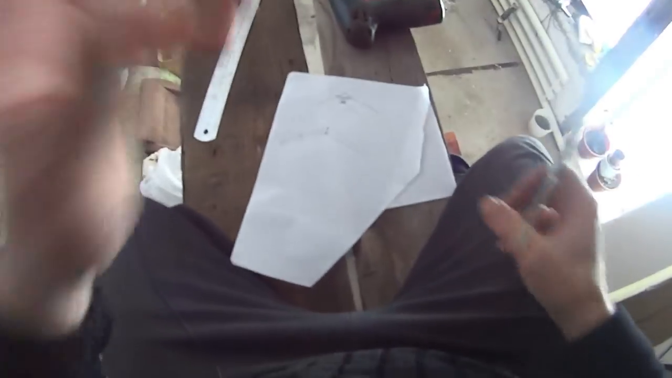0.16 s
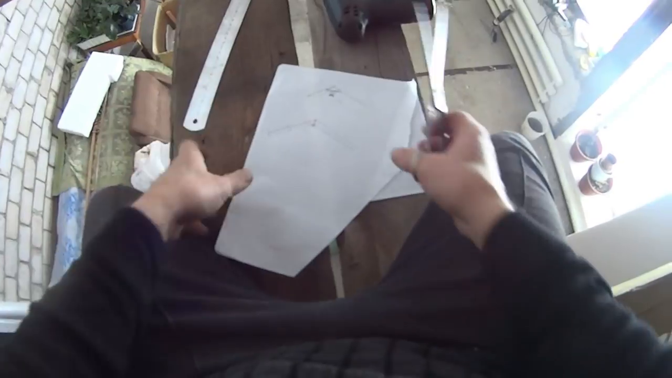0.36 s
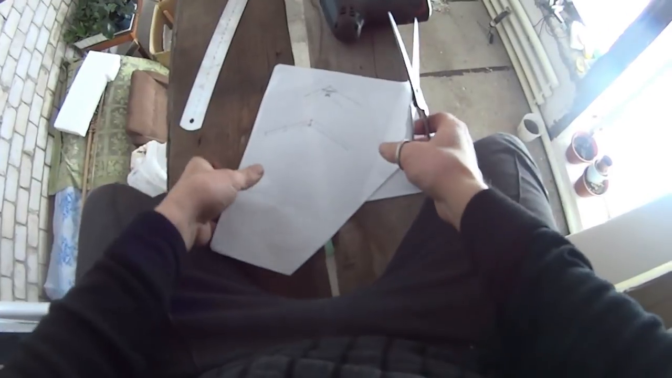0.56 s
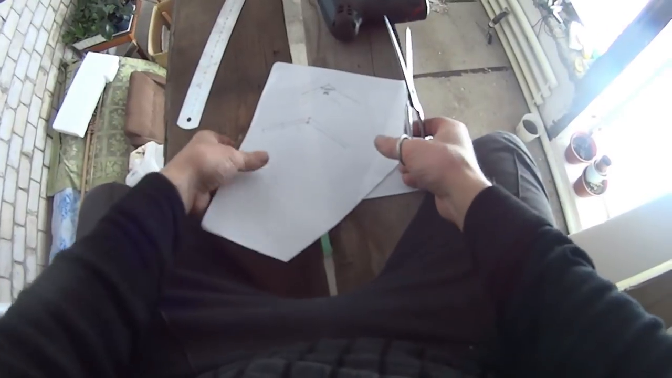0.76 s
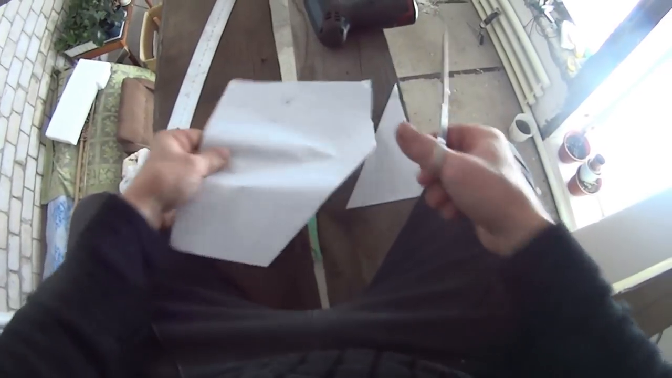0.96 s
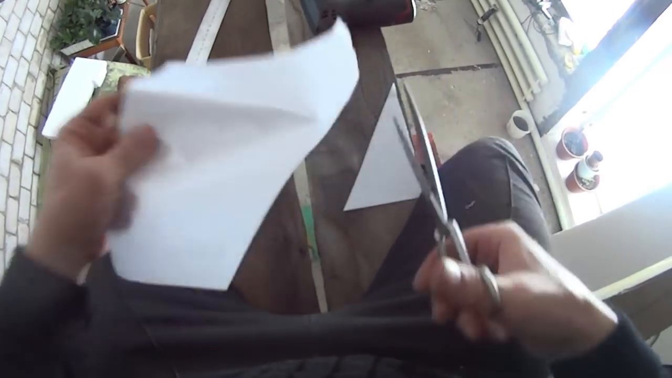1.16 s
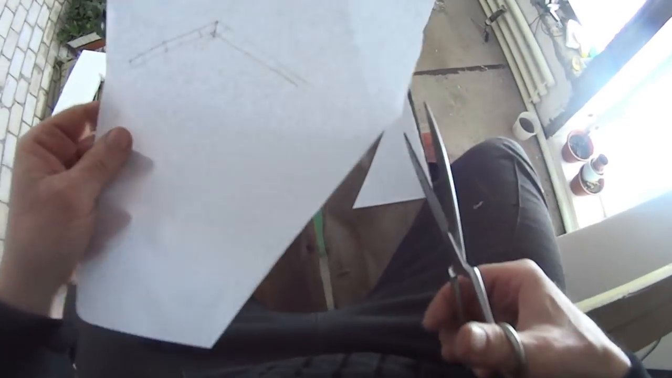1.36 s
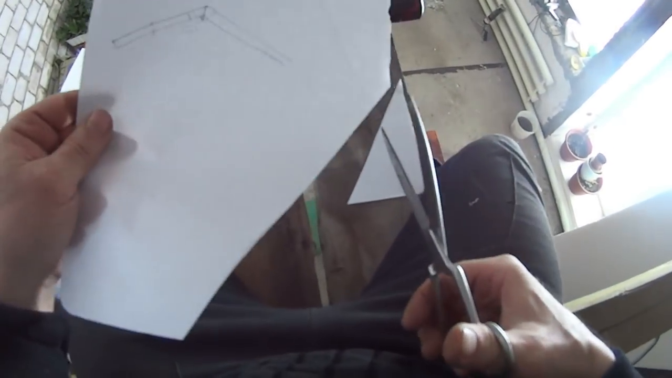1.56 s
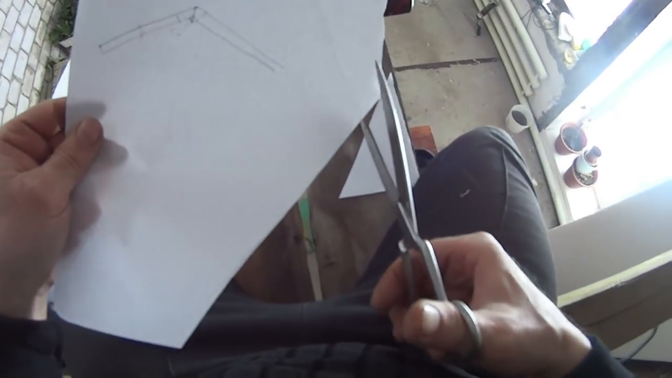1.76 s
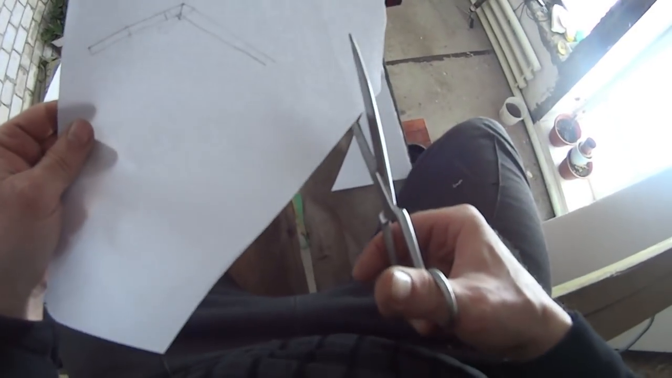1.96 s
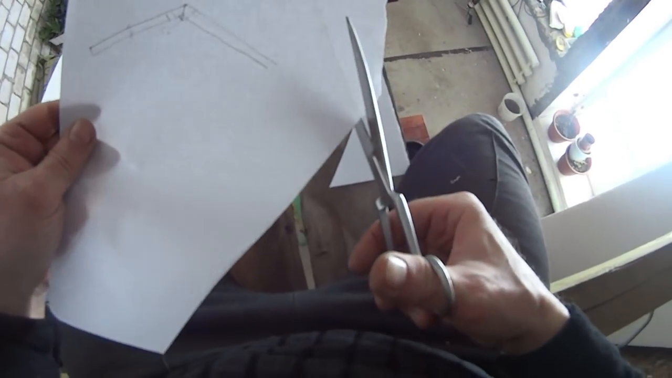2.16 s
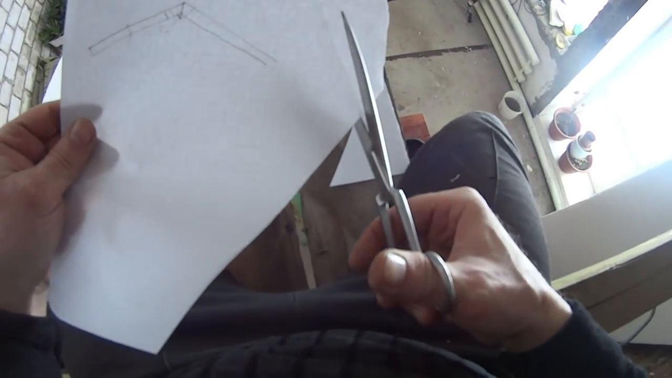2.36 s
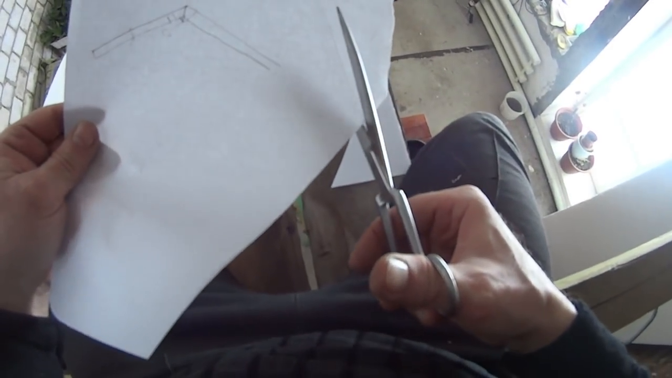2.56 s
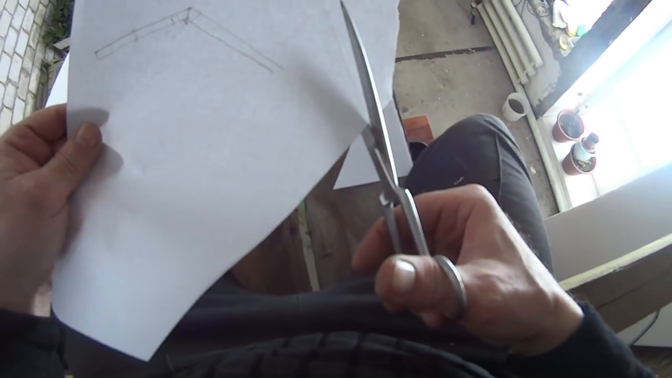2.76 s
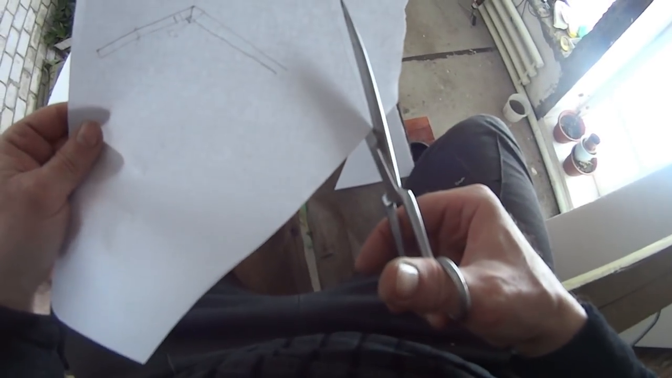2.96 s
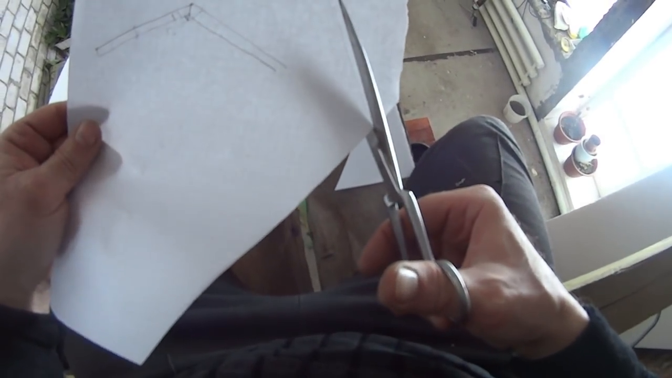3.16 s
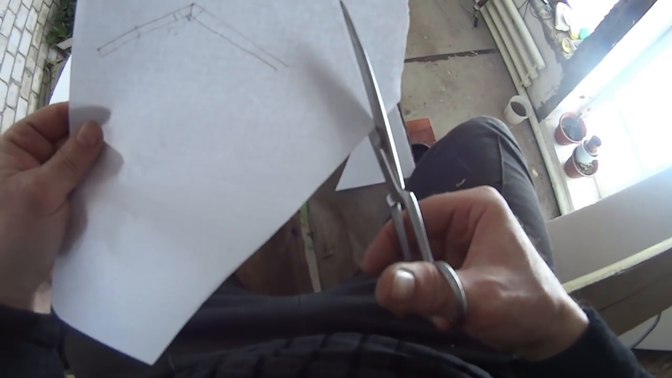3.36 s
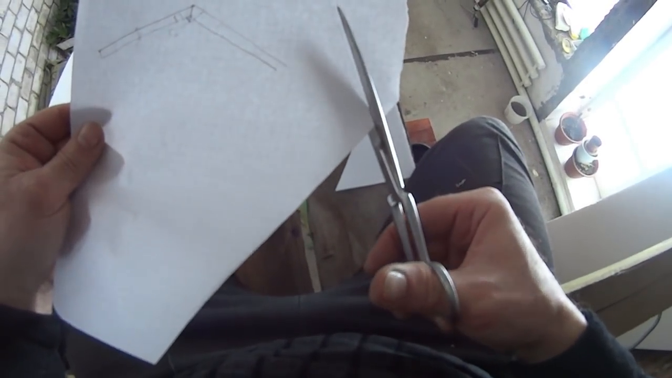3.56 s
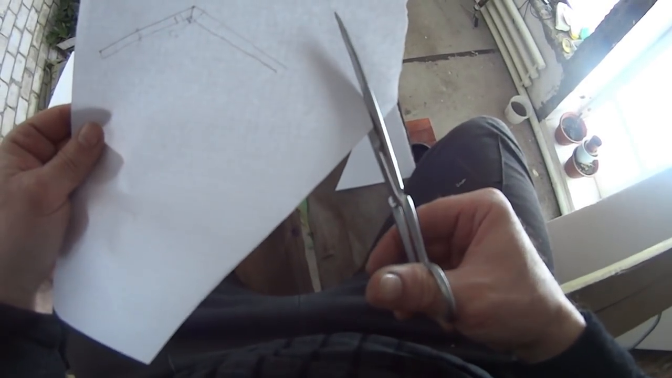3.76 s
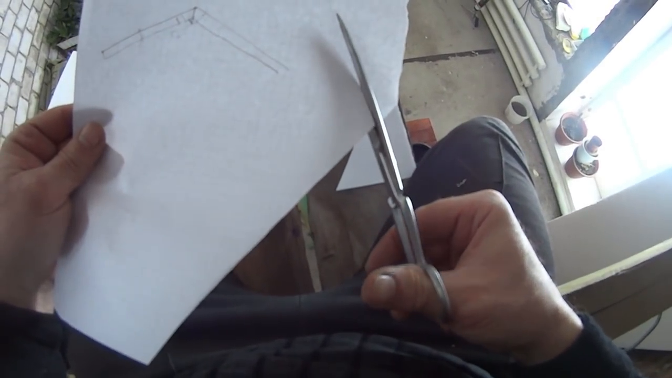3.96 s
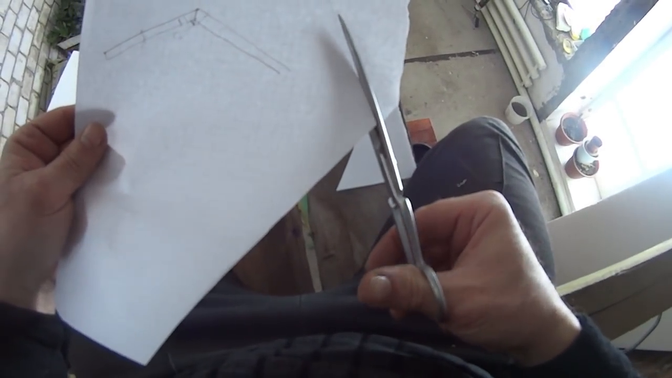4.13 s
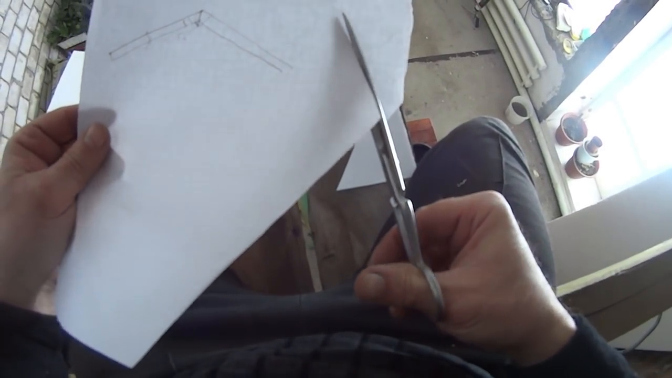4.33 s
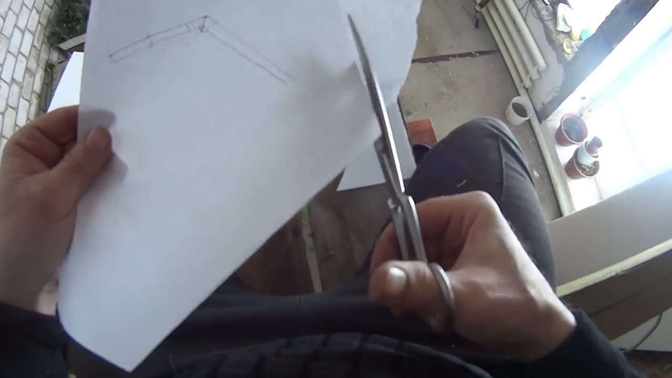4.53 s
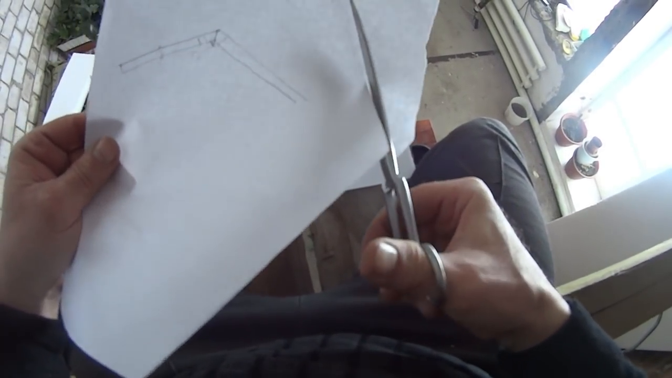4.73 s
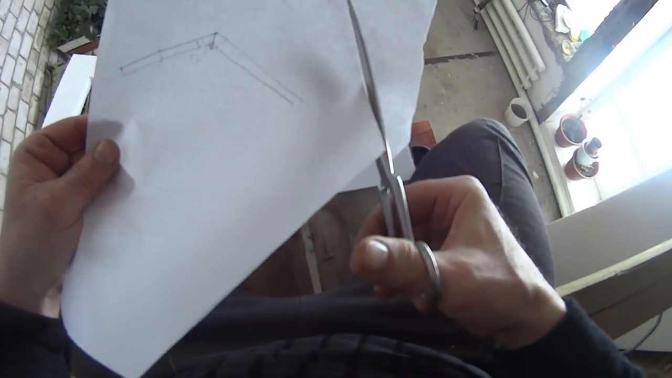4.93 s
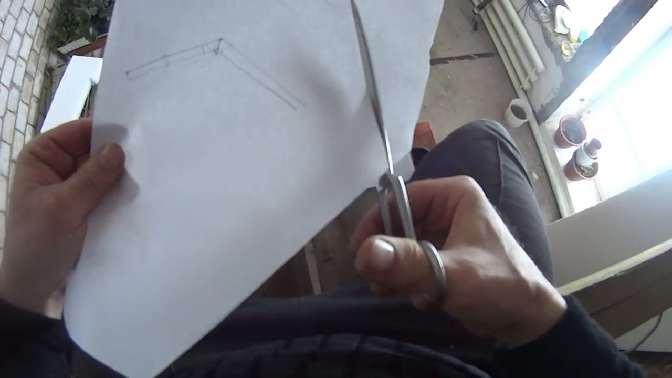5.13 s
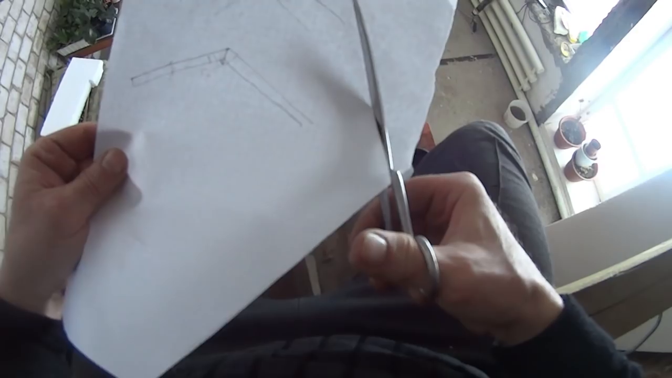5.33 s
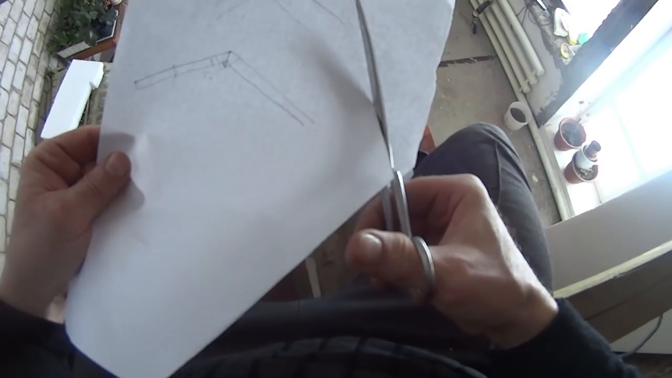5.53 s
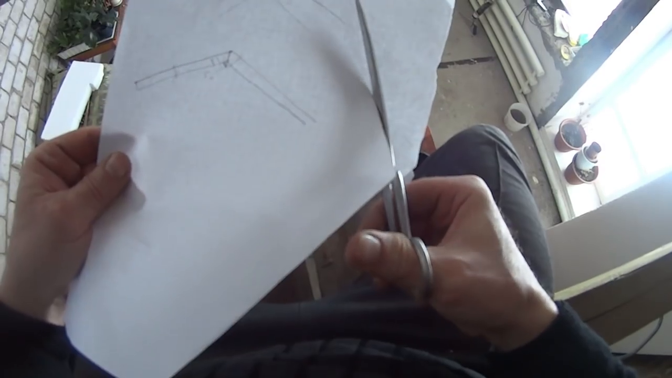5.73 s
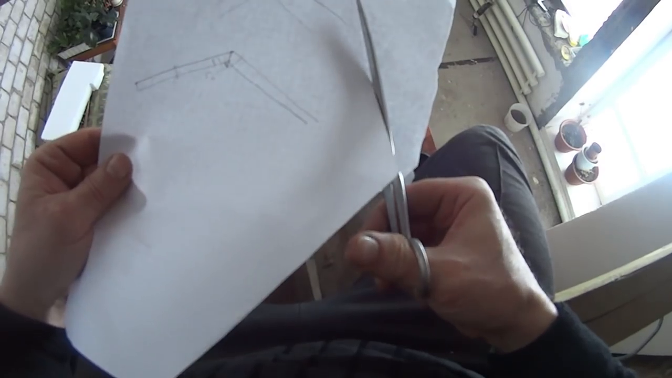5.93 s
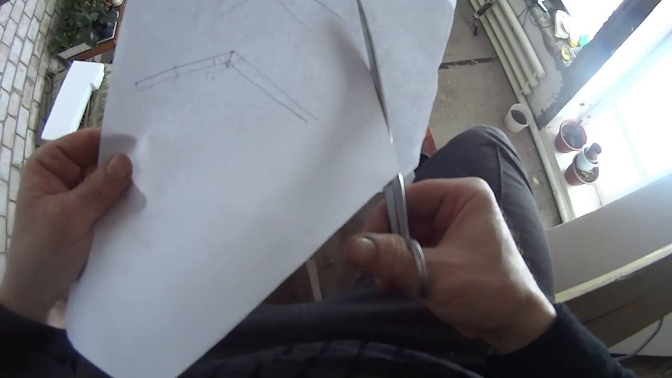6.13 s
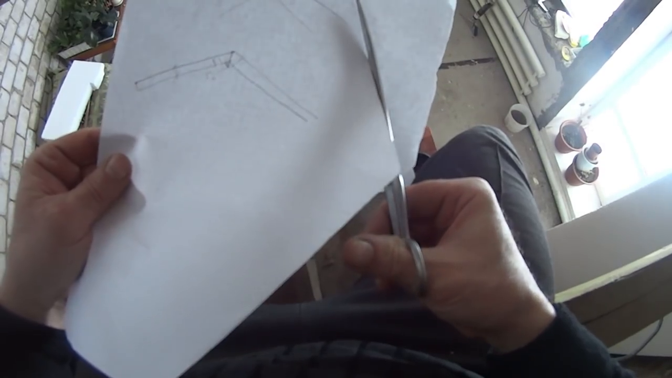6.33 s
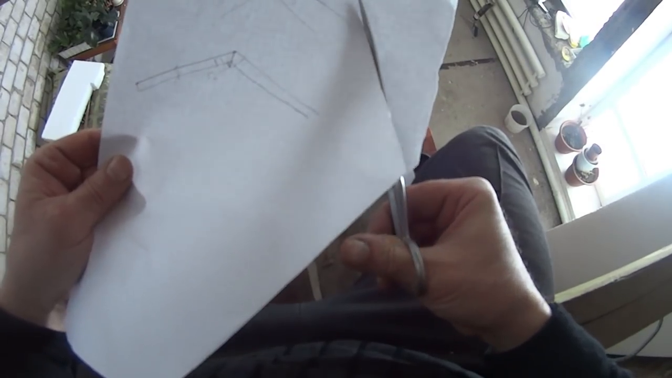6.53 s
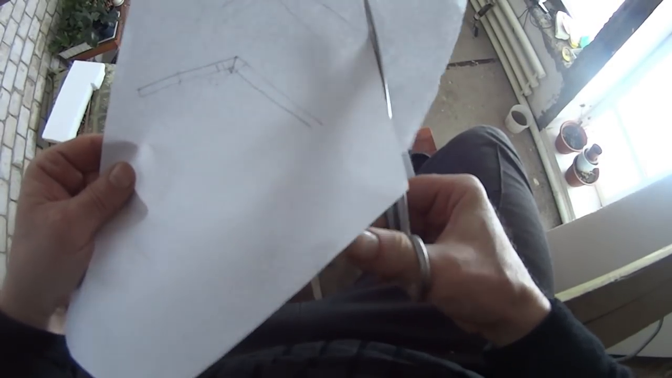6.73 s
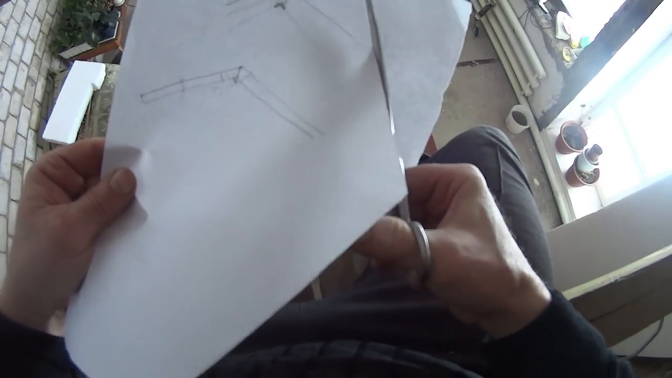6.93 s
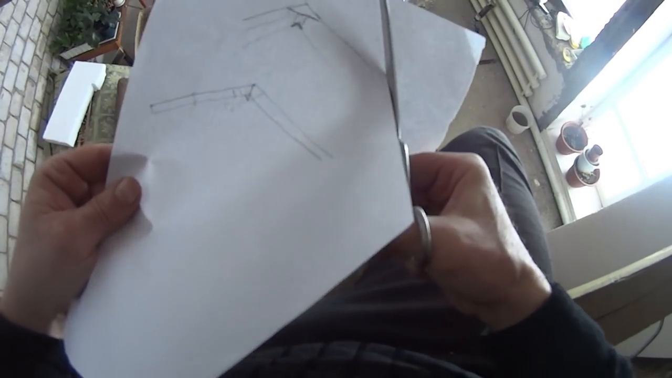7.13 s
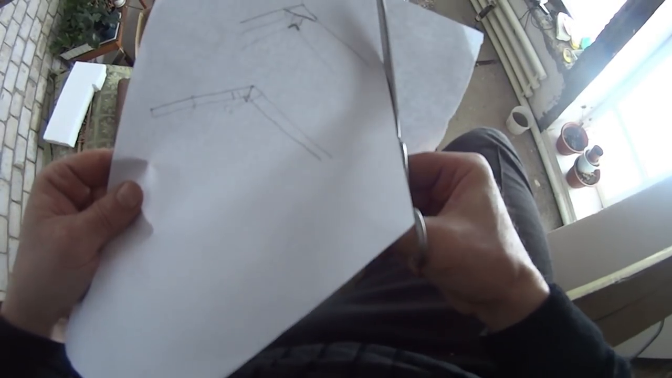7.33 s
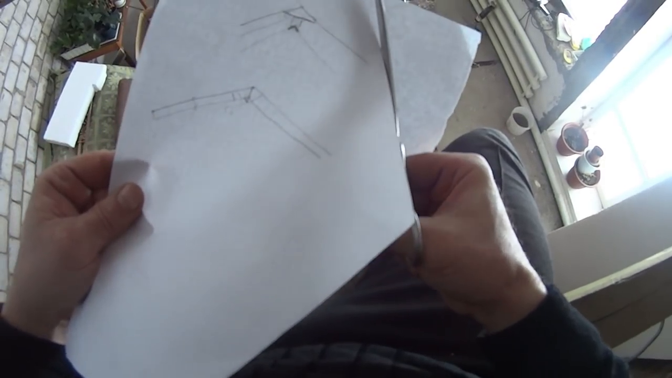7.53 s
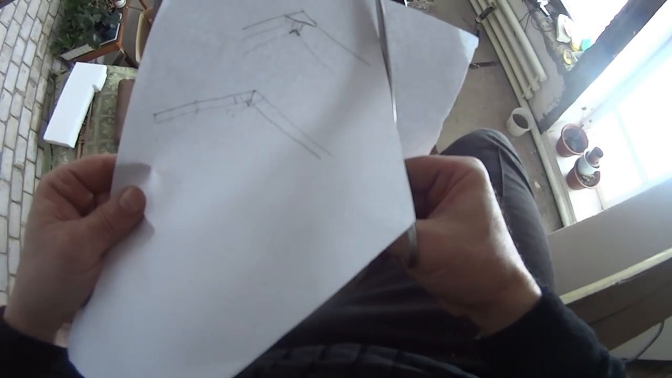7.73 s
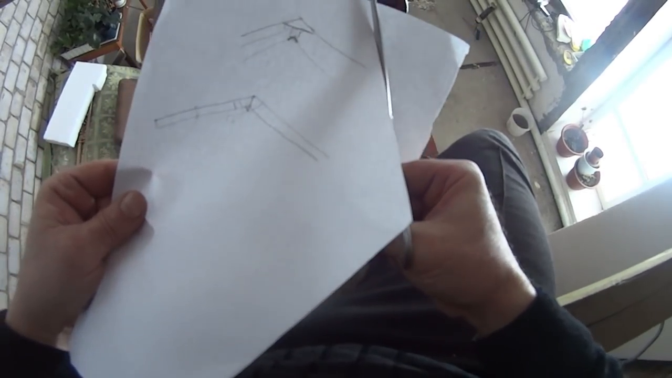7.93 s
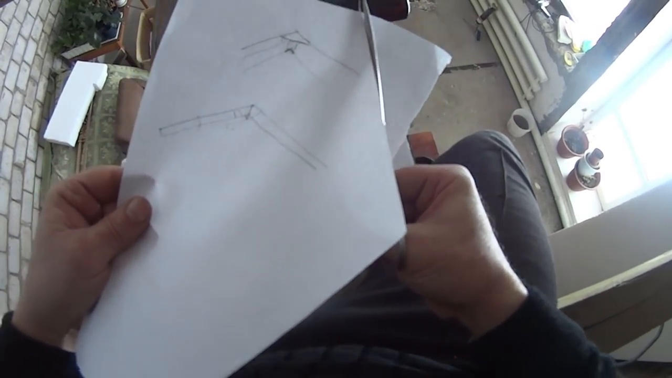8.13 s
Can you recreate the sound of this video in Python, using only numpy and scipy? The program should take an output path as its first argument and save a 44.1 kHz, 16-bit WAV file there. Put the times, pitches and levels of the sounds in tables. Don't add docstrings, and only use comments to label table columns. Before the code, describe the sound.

A quiet, dry room with soft hiss and a barely audible distant machine hum, heard through a close body-worn microphone. At 0.03 s a hard hollow knock strikes the housing. Small taps and faint handling follow; at 0.9-1.7 s the stiff sheet is lifted and turned with crisp crackles, short squeaks of the scissors and dull papery booms. Near quiet until about 3.1 s, then slow gritty snips from 3.3 to 4.3 s, with a very sharp, loud snap at 4.64 s and buckling, sliding paper until 5.3 s. Fine regular bites run from 5.5 to 6.5 s, growing harder. At 6.7 s the binding blades squeal for a twentieth of a second, ending in a loud pop. Paper slides and rustles to 7.2 s, then dense, bright, uneven crunches continue to 8.3 s, with a strong snap near 8.2 s.

```python
import sys
import numpy as np
from scipy import signal
from scipy.io import wavfile
from scipy.ndimage import uniform_filter1d

SR = 44100
rng = np.random.default_rng(int(sys.argv[2]) if len(sys.argv) > 2 else 0)


def transcribe(u):
    v = np.clip(np.atleast_2d(u).T, -1, 1)
    q = np.round(v * 32767).astype(np.int16)
    wavfile.write(sys.argv[1], SR, q)


def voltage_ratio(decibels):
    exponent = np.asarray(decibels, float) / 20
    return 10 ** exponent


N = 365412

# pitch_hz, level_db (rms)
HUM_LINES = [(269, -68.5), (318, -70)]
# freq_hz, level_db (per Hz)
ROOM_COLOUR = [(15, -52), (25, -27), (128, -15), (250, -14.5), (290, -10.5), (620, -10.5), (700, -14.5),
               (1300, -14.5), (3800, -22.5), (10200, -29), (11100, -30.5), (14400, -67)]
ROOM_DB = -56
# freq_hz, likeness (-1 to 1)
ROOM_LIKENESS = [(60, 0.77), (130, 0.64), (260, 0.53), (550, -0.057), (1150, -0.7), (2420, -0.32),
                 (5070, -0.11), (10600, 0.46)]

# pitch_hz, level_db, t60_s
HOUSING_MODES = [(430, 10, 0.0045), (697, -20.5, 0.15), (1000, 4, 0.014), (1700, -1, 0.015),
                 (2250, -10, 0.0075), (4360, 3, 0.0021)]
# start_s, ring_db, push_db, push_direction (signed amount, inward or outward)
KNOCKS = [
    (0.0298, -27, -22.5, -1.2),
    (0.0377, -11.5, -9, 0.99),
]

SQUEAK_STARTS = [0, .925, 1.015, 1.61, 5.527, 4.53, 5.037, 5.17, 1.342, 1.535, .052]
# length_s, pitch_hz,
# width_hz, level_db
SQUEAKS = [(0.0011, 660, 270, -42.5), (0.081, 800, 140, -37.5), (0.022, 710, 55, -39),
           (0.055, 440, 42, -41.5), (0.038, 3300, 450, -49.5), (0.035, 986, 40, -36),
           (0.0085, 2900, 590, -44), (0.072, 420, 73, -38), (0.05, 1670, 120, -52), (0.03, 1020, 70, -48),
           (0.024, 750, 60, -50)]

# start_s,
# peak_db, pitch_hz, t60_s
POPS = [(6.7467, -18, 685, 0.043), (7.996, -28.5, 552, 0.1), (0.133, -46, 466, 0.062),
        (1.351, -32.5, 448, 0.072), (1.413, -36, 513, 0.062), (1.457, -32, 493, 0.085),
        (1.49, -36, 507, 0.044), (1.562, -33, 544, 0.056), (1.62, -25.5, 415, 0.041),
        (1.634, -26.5, 330, 0.038), (3.08, -47, 615, 0.05), (3.099, -35, 438, 0.046),
        (4.336, -32, 477, 0.081), (4.542, -35, 434, 0.05), (4.593, -38, 394, 0.046),
        (4.681, -27, 384, 0.036), (4.723, -26.5, 427, 0.048), (4.792, -31, 430, 0.05),
        (5.016, -58, 423, 0.045), (5.081, -40, 511, 0.05), (5.121, -41, 500, 0.05),
        (5.15, -32.5, 445, 0.05), (5.179, -25, 455, 0.05), (5.213, -26, 383, 0.033),
        (5.273, -35, 433, 0.062), (7.431, -33.5, 442, 0.05), (7.462, -36.5, 480, 0.05),
        (7.589, -35.5, 465, 0.086), (7.667, -32, 550, 0.034), (7.697, -34, 517, 0.032),
        (7.748, -27, 510, 0.022), (7.926, -45, 493, 0.046), (8.063, -39, 507, 0.042),
        (8.101, -35.5, 608, 0.057), (8.157, -27.5, 420, 0.045), (8.196, -33, 567, 0.065),
        (8.234, -24, 416, 0.047)]
# start_s, peak_db, pitch_hz, t60_s
PINGS = [(0.237, -37, 1500, 0.0046), (0.291, -44, 2460, 0.035), (3.8997, -21, 1250, 0.0044),
         (3.972, -41, 1250, 0.029), (5.932, -37, 950, 0.032), (6.116, -40, 980, .025),
         (6.146, -38, 950, 0.022), (.898, -33, 2150, .01), (1.133, -39, 2700, .03),
         (1.198, -37, 2300, .008), (1.298, -29, 3100, .012), (1.652, -40, 430, 0.1),
         (7.991, -33, 1570, 0.0097), (6.074, -33.5, 900, 0.024), (1.294, -33, 1030, 0.04),
         (1.433, -34, 2800, .015), (1.433, -38, 1110, .03), (1.479, -30, 2330, 0.022),
         (1.489, -24.5, 2930, 0.017), (.9, -33.5, 733, 0.093), (.935, -30.5, 716, 0.068),
         (2.762, -59.5, 3150, 0.25), (3.097, -41.5, 1610, 0.031), (3.098, -41, 2420, 0.017),
         (3.098, -43, 940, .03), (3.681, -29, 4500, .004), (4.555, -34, 5500, .02),
         (4.652, -23, 2580, 0.017), (5.053, -29, 2530, 0.0086), (5.083, -34, 1710, 0.032),
         (5.186, -35.5, 1700, 0.04), (5.191, -28.5, 3060, .015), (5.216, -30, 3200, .012),
         (5.296, -31.5, 1810, 0.0086), (6.63, -30, 2190, 0.015), (6.747, -26, 9670, 0.022),
         (6.63, -40, 3030, .02), (6.628, -34, 1360, 0.024), (6.629, -27, 860, 0.022),
         (6.7488, -11, 2400, .004), (7.078, -37, 1773, 0.073), (7.342, -28, 3830, .004),
         (7.4375, -29, 7050, .005), (7.513, -32, 5300, .01), (7.582, -30, 7760, .004),
         (7.617, -39, 7100, .02), (7.844, -29, 5520, .01), (7.941, -31, 5800, .004),
         (7.949, -32, 3500, .004), (8.148, -38, 5250, .012), (8.159, -32, 7500, .005),
         (8.176, -32, 5200, .01)]

# start_s, full_s, letting_go_s, end_s
SQUEAL_TIMES = (6.705, 6.733, 6.748, 6.7525)
# pitch_hz, level_db (rms), lateness (power of the swell)
SQUEAL_LINES = [(1030, -23, 1), (2130, -33, 9), (2660, -36.5, 4.1), (3060, -39, 3.6), (1705, -47, 3.2),
                (1225, -40, 1.2)]
SQUEAL_ROUGH, SQUEAL_SAG = 0.42, 0.19

# start_s, peak_db, tick_hz, thump_db (relative to the tick)
SNAPS = [(0.9228, -19, 1720, -33), (1.2939, -29, 3030, -40), (3.541, -30, 3900, -8),
         (3.6775, -30, 4530, -12), (3.9007, -26.5, 2830, -25), (4.644, -8, 3020, -4),
         (5.0828, -27.5, 3950, -10), (5.295, -32, 3540, -2), (6.427, -37, 1750, -19),
         (6.4672, -21, 3880, -2.5), (6.4977, -35, 2980, -7), (6.6289, -25, 3800, 9), (6.857, -34, 1700, 8),
         (7.484, -20, 3860, -29), (7.583, -26, 3920, -6), (7.6695, -17.5, 7860, -19),
         (7.722, -22, 5200, -4.5), (7.7776, -24.5, 7900, -4), (7.829, -19, 8050, -37),
         (7.9954, -25, 1570, -16), (8.1005, -29, 2590, -21), (8.2019, -12, 5050, -21),
         (8.2494, -27, 5250, -7)]

# time_s, drag_db, flexing_db, brightness_db
HOLD = [(0, -62.5, -60.5, -2), (.7, -62.5, -55.5, 3), (1.0, -52, -61, 13.5), (1.24, -52.5, -61, 0),
        (1.62, -54.5, -42.5, -5), (1.87, -77.5, -59.5, 21.5), (3.1, -67, -63, -3), (3.5, -55, -54, -2),
        (4.1, -64.5, -64, 2.5), (4.5, -54.5, -48, -2), (4.9, -66, -56.5, 2), (5.15, -63, -47.5, -8),
        (5.4, -65.5, -57.5, -4.5), (5.8, -53, -48.5, 0.5), (6.2, -71, -53, -0.5), (6.6, -59.5, -49, -5.5),
        (7.45, -57.5, -75, 1), (8.28, -72, -43.5, 0.5)]
# start_s, hiss_db, length_ms, flexing_db, brightness_db
RUSTLES = [(.004, -40, 40, -57, -8), (0.032, -35.5, 5.2, -31.5, -2), (.045, -60.5, 68, -63, 10),
           (0.287, -64, 20, -57, -22), (.41, -59.5, 69, -55, -5), (0.503, -54.5, 59, -56, 8.5),
           (.736, -56.5, 59, -46, 13), (.807, -54, 33, -51, 10), (0.837, -47.5, 44, -45.5, -2),
           (0.89, -42, 135, -44.5, 3.5), (0.9218, -25, 6.6, -32, -6), (.951, -29.5, 7.2, -51, 3),
           (.974, -33.5, 14, -61, 2), (1.016, -31, 5.6, -58, 4), (1.026, -41, 36, -44, -6),
           (1.125, -45, 51, -51, 3), (1.292, -29, 6.8, -33.5, -7.5), (1.307, -48.5, 217, -45, 2),
           (1.383, -38.5, 24, -52, 0.5), (1.423, -56.5, 72, -43, -24), (1.482, -49.5, 25, -43, -25),
           (1.551, -50, 36, -38.5, -23.5), (1.592, -54.5, 21, -38, -26), (1.625, -66, 15, -48, -17),
           (3.072, -57.5, 33, -49.5, -4), (1.17, -53, 16, -47, 10)]
# start_s, hiss_db, length_ms, flexing_db, brightness_db
SLIDES = [(3.246, -52.5, 84, -58, -5.5), (3.435, -45.5, 28, -44, -5), (3.473, -47, 36, -43, 2),
          (4.232, -41, 33, -44, -5.5), (4.19, -54, 39, -52, 12), (4.283, -36, 27, -60, -4.5),
          (4.326, -46, 37, -49, -6), (4.525, -39, 69, -41, 3.5), (4.59, -40, 61, -40.5, -0.5),
          (4.652, -38.5, 19, -28, -11), (4.668, -40, 58, -38, -5), (4.71, -37.5, 39, -38, -5.5),
          (4.786, -41, 28, -38.5, -1), (4.81, -54.5, 26, -49, 11), (5.033, -47, 41, -52, -3.5),
          (5.171, -42, 69.5, -37, -4.5), (5.239, -51, 57, -44.5, -6), (5.425, -55, 37, -69, 5),
          (6.703, -38, 30, -40, -1.5), (6.725, -33.5, 37, -39, -12), (6.761, -44.5, 60, -35, -6.5),
          (6.855, -40, 87, -39.5, -0.5), (6.962, -43, 98, -47, -2), (7.043, -38.5, 63, -39, 4),
          (7.108, -45, 76, -47.5, 0.5), (7.188, -43, 29.5, -35.5, -1), (7.265, -47.5, 84, -55, -0.5)]
# start_s, hiss_db
FIRST_CUT = [(1.96, -63), (2.756, -50.5), (3.152, -57.5), (3.398, -52), (3.334, -48), (3.515, -46.5),
             (3.54, -38.5), (3.564, -44.5), (3.592, -48), (3.623, -47.5), (3.651, -49), (3.677, -37),
             (3.692, -46), (3.721, -48.5), (3.795, -45.5), (3.815, -57), (3.861, -49), (3.878, -45.5),
             (3.916, -48), (3.948, -50), (3.967, -45.5), (4.016, -55), (4.029, -51), (4.083, -47),
             (4.138, -50.5), (4.156, -54), (4.173, -49.5), (4.212, -40), (4.263, -36), (4.311, -29.5),
             (4.643, -31), (4.964, -55), (5.082, -46.5), (5.1, -58)]
# start_s, hiss_db
SECOND_CUT = [(5.535, -49.5), (5.568, -52.5), (5.592, -49), (5.655, -48), (5.684, -58), (5.709, -47),
              (5.737, -49), (5.788, -48.5), (5.832, -43), (5.894, -50), (5.924, -45), (5.961, -40.5),
              (5.985, -40), (6.004, -45), (6.043, -49.5), (6.074, -37), (6.112, -46), (6.141, -45),
              (6.172, -56), (6.192, -51), (6.212, -55), (6.228, -50.5), (6.241, -51), (6.256, -49),
              (6.282, -41), (6.301, -47), (6.319, -52), (6.353, -44), (6.372, -48), (6.399, -45),
              (6.425, -38.5), (6.445, -48), (6.466, -29), (6.479, -37), (6.499, -30), (6.508, -36),
              (6.52, -41)]
# start_s, hiss_db, length_ms
THIRD_CUT = [(6.63, -30.5, 4.3), (6.665, -52, 11), (6.684, -40, 7.4), (7.233, -46.5, 30), (7.3, -49, 28),
             (7.334, -44, 17), (7.368, -41.5, 15), (7.392, -40, 26), (7.423, -43, 33), (7.461, -42, 23),
             (7.483, -35, 13), (7.5, -41.5, 42), (7.547, -46, 14), (7.583, -38, 19), (7.614, -39.5, 11.5),
             (7.639, -39, 9.5), (7.67, -36, 10), (7.692, -41.5, 17), (7.721, -33, 8.8), (7.746, -39.5, 8.3),
             (7.772, -39.5, 31), (7.812, -46, 7.4), (7.827, -39.5, 6.4), (7.841, -41, 20), (7.866, -46, 18),
             (7.894, -49, 4.2), (7.913, -44, 5.5), (7.923, -39.5, 17), (7.939, -39, 5.7), (7.948, -38, 6.3),
             (7.991, -36, 16), (8.012, -48, 22), (8.041, -49, 6.7), (8.061, -37, 7.2), (8.097, -39.5, 22),
             (8.126, -45, 9.4), (8.139, -39, 26), (8.175, -34, 7.5), (8.197, -27, 14.5), (8.213, -48, 17),
             (8.2494, -28, 2.6)]
HARD_BITE_DB, HARD_BITE_MS, SOFTER_MS_PER_DB = -34, 9.8, 0.38
DRAG_FROM_S, DRAG_TO_S, DRAGGED = 5.5, 6.03, 0.29
BITE_FLEX_DB, FLEX_PER_DB = -37.5, 0.8
FLEX_SPREAD_S = 0.055
DEEP_FROM_S, DEEP_FLEX_DB = 7.22, -2.5

# freq_hz, level_db (per Hz)
TEAR_COLOUR = [(470, -24), (800, 1.5), (1010, 3), (1420, -8), (1730, -2.5), (2350, -6), (2590, -3.5),
               (3570, -6.5), (4750, -10), (6310, -8.5), (8130, -12.5), (11100, -17.5), (14400, -49),
               (22000, -120)]
# pitch_hz, width_hz, gain_db
BLADE_MODES = [(1660, 93, 4.5), (2590, 960, 4), (3730, 540, 3), (5500, 750, 1.5), (7800, 240, 0.5)]
# freq_hz, level_db (per Hz)
FLEX_COLOUR = [(100, -48), (170, -13), (301, -5.5), (377, -1), (500, -1), (622, -2.5), (683, -11),
               (963, -13.5), (1100, -22.5), (1430, -27), (2420, -120)]
# freq_hz, level_db (per Hz)
WOBBLE_COLOUR = [(20, -19), (60, -2.5), (140, 3.5), (200, -6.0), (400, -50.5)]
# pitch_hz, width_hz, gain_db
TURN_COLOUR = [(1430, 500, 8), (2110, 500, 5), (3570, 1400, -0.5)]
TURN_FROM_S, TURN_TO_S = 1.302, 1.72
# pitch_hz, width_hz, gain_db
FLAP_COLOUR = [(900, 350, 3), (1700, 1100, -2.5), (3200, 1100, 1.5)]
FLAP_FROM_S, FLAP_TO_S = 5.5, 6.56
# pitch_hz, width_hz, gain_db
PIVOT_COLOUR = [(2300, 1800, -3), (4750, 1200, -4.5), (5150, 460, 5), (6500, 1000, -1), (8000, 600, 3)]

# freq_hz, likeness (0 to 1)
CLOSE_LIKENESS = [(60, 0.96), (140, 0.89), (340, 1), (800, 0.9), (1890, 0.72), (4480, 0.85), (10600, 0.9)]
# freq_hz, lead_rad
LEAD = [(30, 0), (200, -0.41), (600, -0.74), (1350, -0.51), (1800, 0.41), (5000, -0.39), (10800, 0.6)]
# freq_hz, level_db
TILT = [(60, 1), (220, -3), (800, -2.0), (2910, -1), (10600, 0.5)]


def evened(x):
    return x / np.sqrt(np.mean(x ** 2) + 1e-20)


def read(points, hz):
    f, value = np.transpose(points)
    return np.interp(np.log(hz + 1), np.log(f + 1), value)


def add(mix, s, sound):
    part = mix[..., round(s * SR):][..., :sound.shape[-1]]
    part += sound[..., :part.shape[-1]]


def colour(x, db_of_hz):
    log_gain = np.log(voltage_ratio(np.maximum(db_of_hz(abs(np.fft.fftfreq(4096, 1 / SR))), -90)))
    taps = np.fft.ifft(np.exp(np.conj(signal.hilbert(log_gain)))).real[:2048]
    return signal.oaconvolve(x, taps[None] / np.linalg.norm(taps), axes=1)[:, :N]


def bumps(table, hz):
    return sum(db / (1 + (2 * (hz - f) / w) ** 2) for f, w, db in table)


def swell(length_s, rise_s, fall_s):
    t = np.arange(0, length_s, 1 / SR)
    ramp = np.minimum(t / rise_s, (length_s - t) / fall_s)
    return np.sin(np.pi / 2 * np.clip(ramp, 0, 1)) ** 2


def smooth_patches(patches, bins, frames):
    return evened(uniform_filter1d(uniform_filter1d(patches, bins, 0), frames, 1))


def hum():
    t = np.arange(N) / SR
    waver = uniform_filter1d(rng.standard_normal((2, len(HUM_LINES), N)), 6000)
    out = 0
    for (hz, db), a, b in zip(HUM_LINES, *waver):
        line = a * np.sin(2 * np.pi * hz * t) + b * np.cos(2 * np.pi * hz * t)
        out = out + voltage_ratio(db) * evened(line)
    return out


def room():
    frames, hz = N // 256 + 5, np.fft.rfftfreq(1024, 1 / SR)
    a, b, c, d, patches = rng.standard_normal((frames, 513, 5)).T
    patches = smooth_patches(patches, 10, 8)
    same = np.clip(read(ROOM_LIKENESS, hz), -1, 1)[:, None]
    left, other = a + 1j * b, c + 1j * d
    z = np.array([left, same * left + np.sqrt(1 - same ** 2) * other])
    z *= voltage_ratio(read(ROOM_COLOUR, hz)[:, None] + 1.64 * patches)
    return voltage_ratio(ROOM_DB) * evened(signal.istft(z, nperseg=1024, noverlap=768)[1][:, :N])


def walls(x):
    t = np.arange(4000) / SR
    tail = rng.standard_normal((1, 4000)) * voltage_ratio(-60 * t / 0.19) * (t > .0025)
    return signal.oaconvolve(x, tail / np.linalg.norm(tail), axes=1)[:, :N]


def knock():
    out, t = np.zeros((2, N)), np.arange(6000) / SR
    for s, ring_db, push_db, sign in KNOCKS:
        ring = sum(voltage_ratio(db - 60 * t / t60) * np.sin(2 * np.pi * hz * t + [[-1.2], [.4]])
                   for hz, db, t60 in HOUSING_MODES)
        u = t - [[.0022], [.0017]]
        push = -sign * np.exp(-(u / [[.0009], [.0021]]) ** 2) * np.cos(2 * np.pi * u * [[220], [320]])
        onset = 1 - np.exp(-t / 0.00041)
        add(out, s, (voltage_ratio(ring_db) * ring + voltage_ratio(push_db) * push) * onset)
    return out


def squeaks():
    out = np.zeros((2, N))
    for s, (length, hz, width, db) in zip(SQUEAK_STARTS, SQUEAKS):
        shape = swell(length + 0.015, 0.55 * length, 1.08 * length)
        r = np.exp(-np.pi * width / SR)
        resonance = [1, -2 * r * np.cos(2 * np.pi * hz / SR), r * r]
        rub = signal.lfilter([1, 0, -1], resonance, rng.standard_normal((2, 6000)))
        add(out, s, voltage_ratio(db) * evened(rub[:, 1500:1500 + len(shape)]) * shape)
    return out


def taps():
    out, t = np.zeros((2, N)), np.arange(4000) / SR
    for s, db, hz, t60 in POPS + PINGS:
        note = np.sin(2 * np.pi * hz * t) * (1 - np.exp(-t * hz / 0.35))
        add(out, s, voltage_ratio(db - 1 - 60 * t / abs(t60)) * note * [[1], [.4]])
    return out


def squeal():
    start, top, go, end = SQUEAL_TIMES
    out, shape = np.zeros((2, N)), swell(end - start, top - start, end - go)
    t = np.arange(len(shape)) / SR
    unbound = 1 - np.minimum(t / (top - start), 1)
    t = t + SQUEAL_SAG * (top - start) / 2 * unbound ** 2
    for hz, db, late in SQUEAL_LINES:
        waver = evened(uniform_filter1d(rng.standard_normal((2, 2400)), 160))
        a, b = waver[:, :len(t)] * SQUEAL_ROUGH
        line = (1 + a) * np.sin(2 * np.pi * hz * t) + b * np.cos(2 * np.pi * hz * t)
        add(out, start, voltage_ratio(db - 0.5) * line * shape ** late * [[1], [-.3]])
    return out


def snaps():
    out, t = np.zeros((2, N)), np.arange(900) / SR
    for s, db, hz, thump_db in SNAPS:
        tick = np.sin(-2 * np.pi * hz * t) * np.exp(-t * np.sqrt(hz) / 0.038)
        spray = 0.2 * rng.standard_normal((2, 900)) * np.exp(-t / 0.00026)
        low = np.sin(2 * np.pi * 380 * rng.uniform(0.874, 1.26) * t)
        low = low * np.exp(-t / 0.0033) * (1 - np.exp(-t / 0.002))
        add(out, s, voltage_ratio(db - 3.0) * (tick + spray + voltage_ratio(thump_db + 4.0) * low) * [[1], [.4]])
    return out


def bites():
    timed = []
    for s, db in FIRST_CUT + SECOND_CUT:
        ms = max(HARD_BITE_MS + SOFTER_MS_PER_DB * (HARD_BITE_DB - db), 4)
        timed.append((s, db, ms * (1 + DRAGGED * (DRAG_FROM_S < s < DRAG_TO_S))))
    hold_s, _, _, hold_bright_db = np.transpose(HOLD)
    out = []
    for s, db, ms in timed + THIRD_CUT:
        flex_db = BITE_FLEX_DB + FLEX_PER_DB * (db - HARD_BITE_DB) + DEEP_FLEX_DB * (s > DEEP_FROM_S)
        out.append((s, db, ms, flex_db, np.interp(s, hold_s, hold_bright_db)))
    return out


def movements():
    s, *columns = np.transpose(HOLD)
    drag_db, hold_db, bright_db = (np.interp(np.arange(N) / SR, s, c) for c in columns)
    low, top, flex = voltage_ratio(2 * drag_db - bright_db), voltage_ratio(2 * drag_db + bright_db), voltage_ratio(2 * hold_db)
    for start, db, ms, flex_db, tilt_db in RUSTLES + SLIDES + bites():
        edge = 0.0014 + 0.56 * min(ms, 45) / 1000
        slip = swell(ms / 1000 + 0.96 * edge, 1.04 * edge, 1.5 * edge) ** 2
        add(low, max(start - edge / 2, 0), voltage_ratio(2 * db - tilt_db) * slip)
        add(top, max(start - edge / 2, 0), voltage_ratio(2 * db + tilt_db) * slip)
        bend = swell(ms / 1000 + 1.4 * FLEX_SPREAD_S, FLEX_SPREAD_S, 1.86 * FLEX_SPREAD_S) ** 2
        add(flex, max(start - FLEX_SPREAD_S / 2, 0), voltage_ratio(2 * flex_db) * bend)
    return low, top, flex


def fibres(per_s, spread_db):
    size = voltage_ratio(spread_db * np.minimum(rng.exponential(1, (2, N)), 3.4))
    size = size * (rng.random((2, N)) < per_s / SR)
    return evened(size * rng.standard_normal((2, N)))


def tearing(low, top):
    def ring(hz):
        return read(TEAR_COLOUR, hz) + bumps(BLADE_MODES, hz)

    def high(hz):
        return 1 / (1 + (4500 / (hz + 1)) ** 6)

    dull = colour(fibres(9000, 2.5) * np.sqrt(low), lambda hz: ring(hz) + 10 * np.log10(1.001 - high(hz)))
    crisp = colour(fibres(12000, 3.65) * np.sqrt(top), lambda hz: ring(hz) + 10 * np.log10(high(hz) + 1e-6))
    blades = voltage_ratio(-4.0) * dull + voltage_ratio(-3.5) * crisp
    t = np.arange(N) / SR
    deep = t > DEEP_FROM_S
    turn = (t > TURN_FROM_S) & (t < TURN_TO_S)
    flap = (t > FLAP_FROM_S) & (t < FLAP_TO_S)
    out = blades * ~(deep | turn | flap)
    out = out + colour(blades * flap, lambda hz: bumps(FLAP_COLOUR, hz))
    out = out + colour(blades * deep, lambda hz: bumps(PIVOT_COLOUR, hz))
    return out + voltage_ratio(-0.5) * colour(blades * turn, lambda hz: bumps(TURN_COLOUR, hz))


def flexing(low, top, flex):
    hiss = np.sqrt(low * top)
    jolt = uniform_filter1d(hiss, 200, origin=90) / uniform_filter1d(hiss, 5000)
    body = fibres(4000, 2.2) * np.sqrt(flex) * abs(jolt) ** 0.035
    body = colour(body, lambda hz: read(FLEX_COLOUR, hz))
    wobble = rng.standard_normal((2, N)) * flex ** (0.86 / 2)
    wobble = colour(wobble, lambda hz: read(WOBBLE_COLOUR, hz))
    return voltage_ratio(-2.5) * body + voltage_ratio(-24.0) * wobble


def cutting():
    low, top, flex = movements()
    return tearing(low, top) + flexing(low, top, flex)


def ports(pair):
    hz, _, (a, b) = signal.stft(pair, SR, nperseg=256)
    patches = smooth_patches(rng.standard_normal((a.shape[1], len(hz))).T, 4, 9)
    same = np.clip(read(CLOSE_LIKENESS, hz), 0, 1)[:, None]
    shared, apart = np.sqrt((1 + same) / 2) * a, np.sqrt((1 - same) / 2) * b
    turn = (np.exp(.5j * read(LEAD, hz)) * voltage_ratio(read(TILT, hz) / 2))[:, None]
    z = np.array([(shared + apart) * turn, (shared - apart) / turn]) * voltage_ratio(1.86 * patches)
    return signal.istft(z, SR, nperseg=256)[1][:, :N]


def scene():
    hands = cutting() + squeaks() + snaps() + taps()
    blow = knock()
    close = ports(hands + squeal() + voltage_ratio(-13.5) * walls(hands))
    return close + blow + voltage_ratio(-33.0) * walls(blow) + room() + hum()


def roll_off(x):
    return signal.sosfilt(signal.butter(12, 11210, fs=SR, output="sos"), x)


def record(dry):
    edge = signal.firwin(221, 11080, window=("kaiser", 9), fs=SR)
    mix = signal.oaconvolve(dry, edge[None], "same")
    return roll_off(mix)


dry = scene()
out = record(dry)
transcribe(out)
```